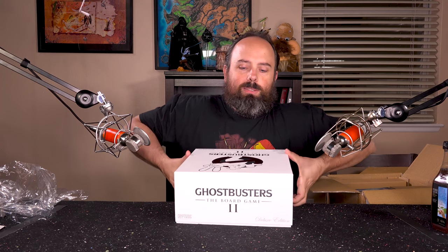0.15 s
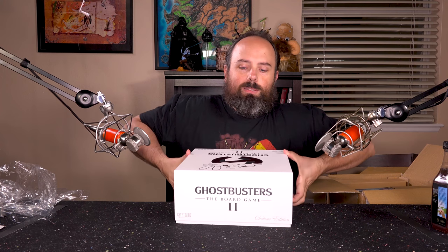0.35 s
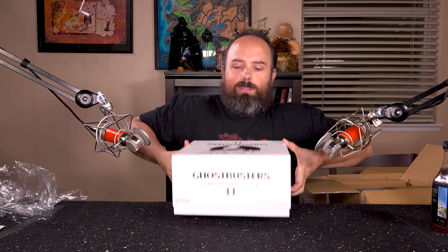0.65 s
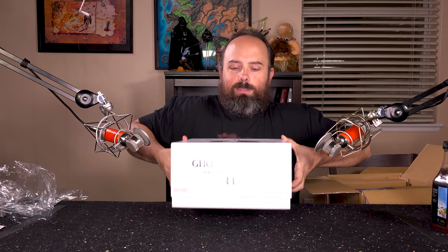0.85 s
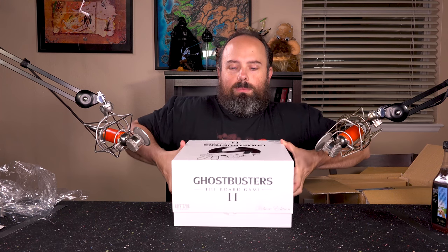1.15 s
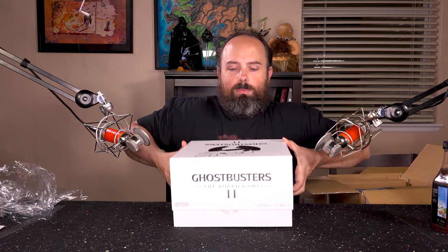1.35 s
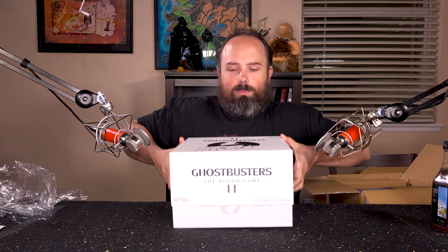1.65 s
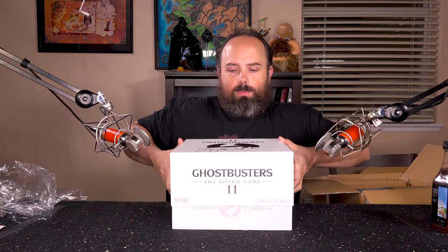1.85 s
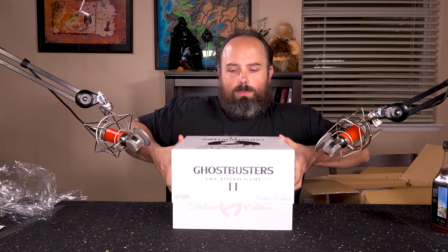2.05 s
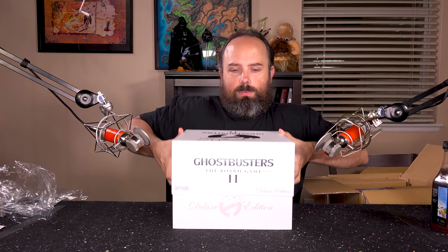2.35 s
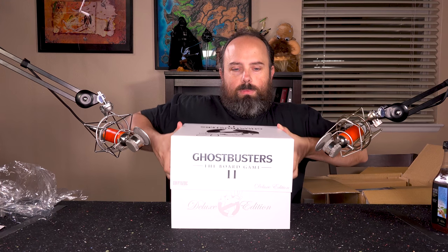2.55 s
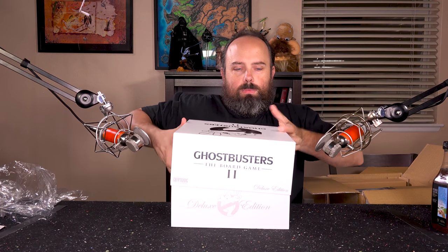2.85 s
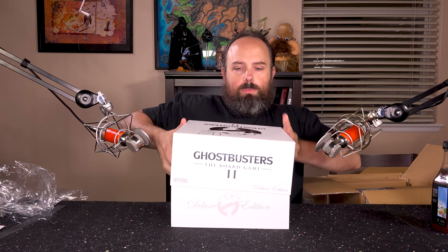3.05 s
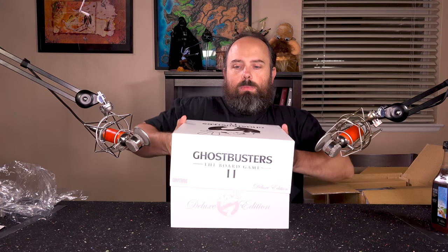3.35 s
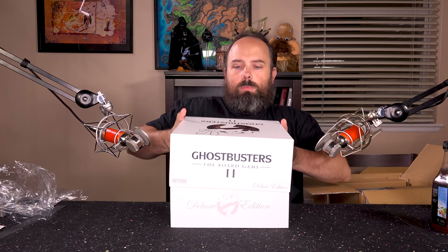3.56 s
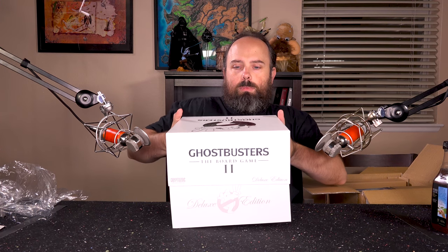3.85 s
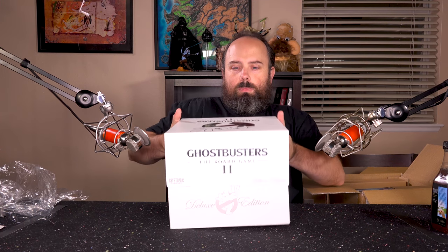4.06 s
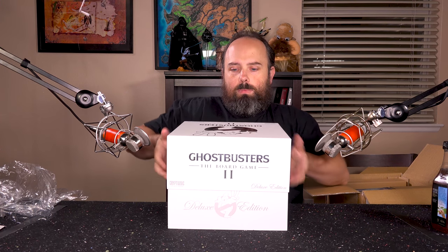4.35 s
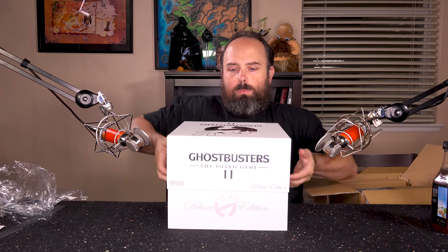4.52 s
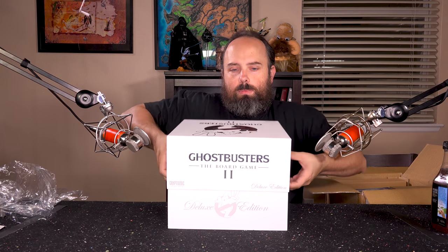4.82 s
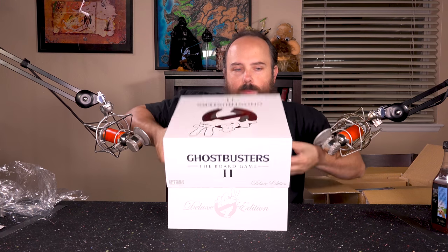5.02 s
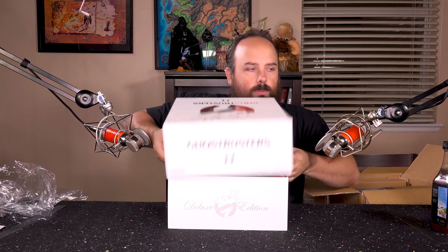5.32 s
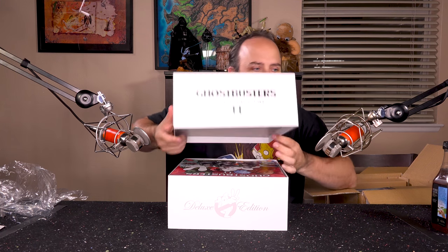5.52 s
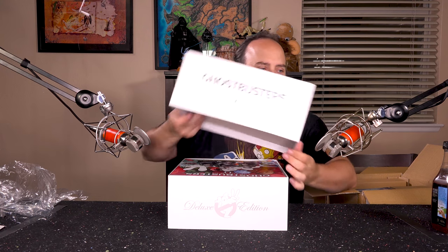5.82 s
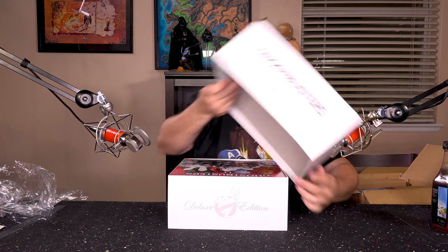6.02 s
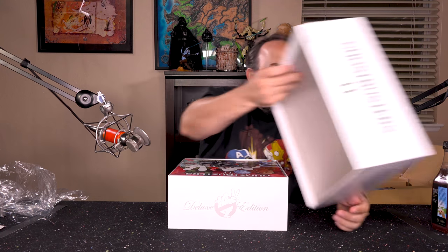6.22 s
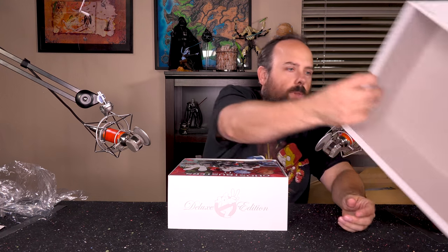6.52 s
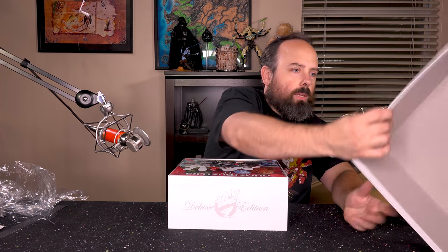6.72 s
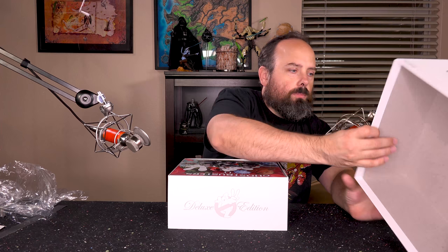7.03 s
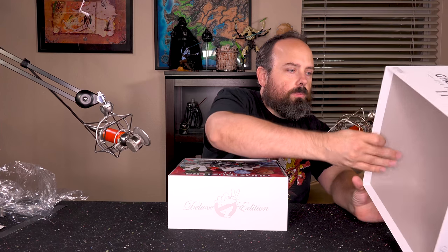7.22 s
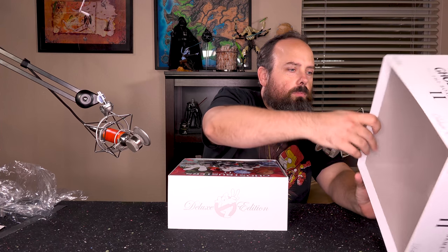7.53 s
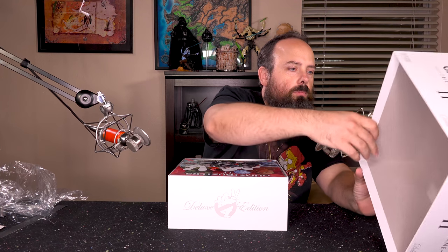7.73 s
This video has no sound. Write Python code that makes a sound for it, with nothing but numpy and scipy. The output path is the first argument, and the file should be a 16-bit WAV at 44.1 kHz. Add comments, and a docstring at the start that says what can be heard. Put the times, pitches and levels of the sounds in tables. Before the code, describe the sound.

Hands work a tight cardboard lid off a large box on a table. A long soft scrape with light knocks comes first, then short tugs, dry skin hisses and dense hollow raps with low thumps. The freed lid swishes aside and bumps down, setting off a brief low springy hum. Close wide stereo in a small quiet furnished room.

```python
"""A tight box lid worked loose by hand

Hands work a tight cardboard lid off its box on a table, between two microphones on sprung arms.
Shaped noise makes the lid drag on the box walls and the skin brush the glossy card.
Dying sines and short noise make the knocks of fingers and corners, and the thumps on the table.
The arms bounce and sway far down in the bass, over a quiet room with a faint drone."""
import sys
import numpy as np
from scipy import signal
from scipy.fft import rfft, irfft, next_fast_len
from scipy.io import wavfile
from scipy.ndimage import uniform_filter1d

SR = 44100
rng = np.random.default_rng(int(sys.argv[2]) if len(sys.argv) > 2 else 0)


def output_pcm(signal):
    """Save a mono or channel-first signal as 16-bit PCM at the path in sys.argv[1].

    Samples are clipped to [-1, 1] before scaling.
    """
    pcm = np.clip(np.atleast_2d(signal).T, -1, 1) * 32767
    wavfile.write(sys.argv[1], SR, np.round(pcm).astype(np.int16))


N = 347508  # samples, about 7.88 s

# the lid lands by a spring of the left arm: (time [s], hum level [dB], boom level [dB])
TWANGS = [(6.764, -16, -6), (6.967, -21.5, -14), (7.055, -21.5, -17)]
SWELL_DB = 31  # how far a movement is below its peak at the ends of its swell and fade times
TUG_ROUND = 1.027  # shape of a swell in dB: 1 = pointed top, 2 = round


def drag():
    """Card fibres rasp along the walls and drive the hollow of the box."""
    # one long slide up the walls: (time [s], rasp [dB], upper over lower modes [dB], hollow [dB])
    slide_rows = [(0, -56.5, 0, -60.5), (.37, -57, -6.5, -52.5), (.46, -43, -13, -53),
                  (.625, -39, -15, -46.5), (.85, -47.5, -16, -46), (.9, -40.5, -3.5, -47),
                  (1.04, -40, -17.5, -36), (1.18, -41, -21, -44.5), (1.36, -37, -9.5, -40.5),
                  (1.46, -42.5, -13, -41), (1.62, -39.5, -16.5, -59), (1.755, -38.5, -5.5, -43.5),
                  (1.85, -38.5, -12, -47), (1.95, -47, -5.5, -49), (2.3, -40.5, 4, -55),
                  (2.58, -39, 5.5, -36), (2.68, -42.5, -4, -45.5), (2.745, -37.5, -11, -28),
                  (3, -49.5, 4, -44), (3.22, -68, -6, -62), (3.35, -92, -2, -88)]
    # then separate tugs: (peak time [s], rasp [dB], swell [s], fade [s],
    # upper over lower modes [dB], hollow [dB])
    tug_rows = [(3.407, -31.5, 0.1, 0.1, -1, -29.5), (3.62, -40.5, 1, 0.054, -7, -38.5),
                (3.786, -39.5, 0.41, 0.29, -5, -35), (3.963, -38.5, 0.1, 0.16, -10.5, -36),
                (4.189, -39, 0.22, 0.22, -5.5, -36), (4.5, -40, 0.055, 0.37, -5, -42),
                (4.7, -45.5, 0.63, 0.9, -6, -33), (4.967, -42, 0.23, 0.37, -4, -25.5),
                (5.19, -44, 1, 0.096, -13.5, -45), (5.6, -49.5, 0.26, 0.37, 3.5, -43.5),
                (6.082, -43.5, 0.24, 0.48, -7.5, -42), (6.3, -41, 0.043, 0.23, 1, -39),
                (6.457, -39, 0.31, 0.32, -2, -50), (6.77, -48, 0.079, 0.52, -8.5, -32),
                (7.02, -64, 0.061, 0.3, -11, -40.5)]
    # where the lid binds: (time [s], left minus right [dB])
    binding = [(0, -4.5), (1, -3), (2.4, -3), (3.65, -6.5), (3.9, -1), (4.4, -3.5), (4.7, 2), (5.2, 2),
               (6, -2), (7.88, -11)]
    # resonances of the walls: (pitch [Hz], width [Hz], relative level [dB])
    upper_modes = [(1333, 480, 13.5), (1666, 560, 9.5), (2360, 910, 7.5), (3165, 670, 0.5),
                   (3550, 6300, 2.5)]
    lower_modes = [(393, 1370, 8.5), (587, 90, 9.5), (802, 190, 9)]
    # resonances of air and walls together: (pitch [Hz], width [Hz], relative level [dB])
    hollow_modes = [(133, 79, 8), (220, 57, 0), (307, 135, 0.5), (393, 20, -0.5)]

    slide_db, slide_bright_db, slide_hollow_db = curves(slide_rows)
    slide_upper, slide_lower = amp(shares(slide_db, slide_bright_db))
    s, db, swell, fade, bright_db, hollow_db = np.transpose(tug_rows)
    tug_levels = shares(db, bright_db) + [hollow_db]
    tug_upper, tug_lower, tug_hollow = humps(s, swell, fade, TUG_ROUND, tug_levels)

    fibres = patchy(grit(6., 2., .012, .07), 3.2)
    scuffs = patchy(grit(7., 4., .009, .07), 3.5)  # uneven catches of the rim
    even = patchy(grit(4., 2., .025, .07), 2.2)  # the long slide surges gently
    scrape = tug_upper * coloured(fibres, peaks(upper_modes))
    scrape += tug_lower * coloured(scuffs, peaks(lower_modes))
    scrape += slide_upper * coloured(even, peaks(upper_modes))
    scrape += slide_lower * coloured(even + 0.36 * scuffs, peaks(lower_modes))
    # soft fibres have little sizzle
    scrape = signal.sosfilt(signal.butter(4, 9500, fs=SR, output="sos"), scrape)

    rub = grit(4., 2., .02, .6)
    hollow = tug_hollow * coloured(rub, peaks(hollow_modes))
    # the slide misses the lowest mode
    hollow += amp(slide_hollow_db) * coloured(rub, peaks(hollow_modes[1:]))
    return sides(curves(binding)[0]) * (scrape + hollow)


def brush():
    """Skin slides over coated card: a fine dry hiss that swells and fades with each stroke."""
    # strokes: (peak time [s], level on the louder side [dB], swell [s], fade [s],
    # left minus right [dB])
    strokes = [(.02, -49, 0.053, 0.24, -4), (.61, -54, 0.45, 1, 3.5), (.908, -46, 0.064, 0.075, 8),
               (1.311, -45.5, 0.058, 0.06, 2), (1.76, -44, 0.027, 0.08, -14), (2.52, -45.5, 0.76, 0.63, 22),
               (2.6, -48, 0.64, 0.096, -17), (2.89, -42, 0.56, 0.18, -11), (3.07, -44, 0.11, 0.13, -3.5),
               (3.346, -32.5, 0.19, 0.25, -17), (3.556, -31.5, 0.14, 0.11, 8),
               (3.678, -29.5, 0.023, 0.065, -24), (3.746, -34, 0.01, 0.021, -14),
               (3.804, -26, 0.043, 0.038, -9), (3.879, -37, 0.03, 0.029, 13),
               (3.951, -31.5, 0.016, 0.022, -5), (4.176, -38.5, 0.084, 0.046, -5),
               (4.33, -44, 0.16, 0.16, -15), (4.467, -45, 0.025, 0.28, -5), (4.78, -51.5, 0.029, 0.35, 9),
               (4.97, -51, 0.16, 0.47, -4), (5.17, -56.5, 1, 0.06, -10), (5.75, -48.5, 0.3, 0.46, 7),
               (6.061, -39, 0.24, 0.085, -4.5), (6.475, -23.5, 0.29, 0.16, -9.5),
               (6.555, -31, 0.033, 0.048, -8), (6.749, -31.5, 0.11, 0.077, -13), (6.83, -39, 0.2, 0.2, -6),
               (7.03, -40, 0.16, 0.34, -10), (7.125, -44, 0.2, 0.1, -5), (7.5, -43.5, 1, 0.8, -11),
               (7.77, -54, 0.14, 0.78, 0.5)]
    # tone of the hiss: (frequency [Hz], relative level per Hz [dB])
    brush_colour = [(1180, -51), (2000, -21), (2270, -16), (4040, -8.5), (5360, -2.5), (7420, -6.5),
                    (9110, -4.5), (10800, -15), (15500, -23)]
    # change of the treble of the hiss: (time [s], extra level [dB])
    dryness = [(0, -3), (2.45, -10), (2.75, 3), (3.2, 4), (5, 5), (6.3, -0.5), (7.2, 3.5), (7.88, 6)]

    s, db, swell, fade, pan_db = np.transpose(strokes)
    hands = humps(s, swell, fade, 1.15, panned(db, pan_db))
    skin = patchy(grit(4., 1., .01, .05), 2.)
    hiss = coloured(skin, spectrum(brush_colour))
    treble = signal.butter(4, 10500, "high", fs=SR, output="sos")
    top = signal.sosfiltfilt(treble, hiss)
    return hands * (hiss + top * (amp(curves(dryness)[0]) - 1))


def knocks():
    """A tick of contact, a rap in the panel modes and a low thud; each side hears its own mix."""
    # knocks on the panels: (time [s], rap [dB], tick relative to rap [dB],
    # thud relative to rap [dB], starting pitch of thud [Hz], left minus right [dB])
    hits = [(0.173, -20, -36, -30, 200, -9), (0.484, -16.5, -41, -10, 427, -12),
            (0.617, -22, -31, 4, 287, 5), (0.816, -27, -33, 4, 308, -12), (0.934, -18.5, -29, -2.5, 244, 3),
            (0.9915, -10.5, -21, 0, 302, -11), (1.038, -20, -34, 5, 404, -5),
            (1.061, -13.5, -36, -2.5, 390, -2), (1.103, -21.5, -24, 5, 272, 3),
            (1.154, -24, -9.5, -12, 275, 2), (1.234, -16.5, -20.5, 0, 297, -3),
            (1.313, -18, -30, 3.5, 210, 12), (1.357, -14.5, -33, -15, 322, 22),
            (2.595, -52.5, 15.5, 6, 220, -11), (2.712, -14.5, -16, 10.5, 290, -11),
            (2.722, -13, -26, 4, 300, 4), (3.032, -4.5, -60, -10.5, 238, 9),
            (3.092, -22.5, -20.5, 7, 233, -10), (3.255, -11.5, -22, 2.5, 279, -11),
            (3.533, -34.5, -6, 22.5, 267, -12), (3.664, -35.5, -4, 27, 288, -11),
            (3.794, -7.5, -48.5, -5, 267, 5), (3.876, -8, -47.5, -5.5, 248, 9),
            (3.946, -21, -15, 10.5, 237, -12), (4.196, -25, -20, 15, 267, -7),
            (4.383, -19.5, -44, 6.5, 212, -15), (4.447, -18, -44, 5, 216, -14),
            (4.47, -18.5, -35, 0, 293, -7), (4.48, -19, -36, 5.5, 298, 3), (4.531, -29, -42, 12, 286, -19),
            (4.55, -3, -62, -2, 150, -23), (4.637, -15, -53, 3.5, 301, 9),
            (4.669, -12.5, -50, 2.5, 254, -14), (4.726, -33, -46, -7, 302, -2),
            (4.787, -12.5, -31, 6, 246, -4), (4.865, -11.5, -50, -8, 208, 15),
            (4.897, -21.5, -38, -15, 250, 22), (4.943, -20, -29, -1, 330, -6),
            (4.956, -31, -40, 21, 327, -4), (4.97, -17, -37, 14.5, 328, 9), (5.002, -13, -38, 6, 390, -9),
            (5.034, -14.5, -18, 4, 315, 3), (5.187, -32, -34, 6.5, 278, -4), (5.376, -20, -48, 14, 402, 5),
            (5.56, -31, -16.5, 11, 161, -25), (6.071, -10.5, -19, 8.5, 187, -3.5),
            (6.284, -14, -10, -0.5, 390, -1.5), (6.755, -28, -49, 5.5, 420, -7),
            (6.961, -38, -69, 30.5, 158, -10)]
    # edge of the card, pitches vary a little: (pitch [Hz], level in tick [dB], 60 dB decay [s])
    snap = [(3846, 5, 0.015), (5230, 10.5, 0.011), (9550, 13, 0.0058)]
    # flat panel, pitches vary a little: (pitch [Hz], relative level [dB], 60 dB decay [s])
    panel = [(457, -10, 0.004), (712, -1.5, 0.055), (870, 4.5, 0.031), (1302, 8.5, 0.024),
             (1770, 13.5, 0.0067), (2070, -14, 0.035), (2375, 13, 0.011)]
    thud_t60, thud_sag = 0.043, .12  # decay by 60 dB (s); share of the pitch lost as the panel settles

    out, t = np.zeros((2, N)), np.arange(8000) / SR
    high = signal.butter(4, [3000, 10500], "band", fs=SR, output="sos")
    middle = signal.butter(2, [500, 3000], "band", fs=SR, output="sos")
    sag = 1 - thud_sag * (1 - np.exp(-t / 0.042))
    for s, db, tick_db, thud_db, thud_hz, pan_db in hits:
        noise = rng.standard_normal((2, len(t)))
        snap_luck = rng.standard_normal((2, len(snap)))
        panel_luck = rng.standard_normal((2, len(panel)))

        tick = amp(1.0) * evened(signal.sosfilt(high, noise)) * amp(-60 * t / 0.026)
        tick += np.array([ring(snap, t, 1 + 0.057 * d) for d in snap_luck])
        tick = dulled(tick, 9000 * amp(.4 * (tick_db + 5)))  # a weaker tick is duller

        modes = np.array([ring(panel, t, 1 + 0.067 * d) for d in panel_luck])
        rap = amp(-14) * modes
        rap += amp(7.5) * signal.sosfilt(middle, noise) * amp(-60 * t / 0.02)
        rap = dulled(rap, 2600 * amp(.3 * (tick_db + 12)))  # a soft pad of flesh dulls the rap

        thud_modes = [(thud_hz, -3, thud_t60), (1.303 * thud_hz, -10, .03)]
        thud = ring(thud_modes, t, [sag, sag]) * (1 - np.exp(-t / 0.0025))

        # flesh also slows the attack
        rise = 1 - np.exp(-t / (0.00059 * amp(-.3 * (tick_db + 14.5))))
        knock = rap + amp(tick_db) * tick - amp(thud_db) * thud
        add(out, s + .0008, amp(db) * sides(pan_db) * rise * knock)
    return out


def lid():
    """Fingers shift their grip on the freed lid, which sings faintly in its own narrow modes."""
    # grips: (peak time [s], level on the louder side [dB], swell [s], fade [s],
    # left minus right [dB])
    grips = [(5.6, -44.5, 0.19, 0.77, -2), (6, -47, 0.015, 0.26, 0), (7.25, -51.5, 0.21, 0.14, -18),
             (7.355, -47.5, 0.075, 0.3, -16), (7.54, -54.5, 0.069, 0.22, -12)]
    # freed lid in the air: (pitch [Hz], width [Hz], relative level [dB])
    lid_held = [(433, 65, 5), (827, 140, 1.5), (1380, 150, -2.5)]
    # lid standing on its edge: (pitch [Hz], width [Hz], relative level [dB])
    lid_down = [(562, 35, -2), (835, 100, 7), (1087, 57, -2), (1610, 160, -0.5)]

    s, db, swell, fade, pan_db = np.transpose(grips)
    hands = humps(s, swell, fade, TUG_ROUND, panned(db, pan_db))
    rub = grit(9.8, 4.6, 0.011, 0.12)
    landed = np.arange(N) / SR > TWANGS[0][0]
    held, down = coloured(rub, peaks(lid_held)), coloured(rub, peaks(lid_down))
    return hands * np.where(landed, down, held)


def twangs():
    """The struck spring hums unsteadily and the air in the empty lid booms, until the lid damps it."""
    hum_hz, hum_t60 = 221, .9  # spring: pitch (Hz), decay by 60 dB (s)
    boom_hz, boom_t60 = 231.8, 0.19  # air in the lid: pitch (Hz), decay by 60 dB (s)
    stop = 7.3  # silent from here (s)

    out, t = np.zeros((2, N)), np.arange(SR) / SR
    for s, hum_db, boom_db in TWANGS:
        loose = rng.standard_normal(SR)
        loose = evened(uniform_filter1d(uniform_filter1d(loose, 500), 500))
        tone = ring([(hum_hz, hum_db, hum_t60), (boom_hz, boom_db, boom_t60)], t, [1, 1])
        rise = 1 - np.exp(-t / 0.012)
        damping = np.clip((stop - s - t) / 0.054, 0, 1)
        rattle = amp(3.2 * loose)
        add(out, s, rattle * tone * rise * damping * amp([[0], [-14]]))  # weaker on the right
    return out


def thumps():
    """The table top booms, reaching the right arm later; each arm bounces on its springs."""
    # thumps into the table, levels before a fixed trim:
    # (time [s], table [dB], bounce of the arms [dB], table left minus right [dB])
    table_hits = [(1.348, -37, -13.5, 16), (1.741, -42, -8.5, -12), (1.957, -36, -19, 16),
                  (2.716, -18, -14.5, -2), (3.248, -24.5, -43, -6), (3.943, -27.5, -29, 0),
                  (4.187, -25, -10, 1), (4.5, -27, -21, -9), (5.22, -35, -21, -18),
                  (6.068, -16, -20.5, -3.5), (6.753, -18.5, -34, -2), (6.963, -23.5, -21, -10.5)]
    # table top, pitches vary a little: (pitch [Hz], relative level [dB], 60 dB decay [s])
    table_modes = [(50.2, -0.5, 0.7), (76, 11, 0.135), (109, 14.5, 0.11), (143.2, -3, 0.4),
                   (186.6, -3, 0.36), (263.4, -1, 0.29)]
    # left arm, right arm: (bounce rate [Hz], 60 dB decay [s])
    arm_bounce = [(22, 1.5), (24, 1.3)]

    out, t = np.zeros((2, N)), np.arange(SR) / SR
    bounce = np.array([ring([(hz, 0, t60)], t, [1]) for hz, t60 in arm_bounce])
    for s, db, bounce_db, pan_db in table_hits:
        luck = rng.standard_normal((2, len(table_modes)))
        boom = np.array([ring(table_modes, t, 1 + 0.06 * d) for d in luck])
        boom *= 1 - np.exp(-t / 0.0032)
        boom[1] = np.interp(t - .004, t, boom[1])  # 4 ms later on the right
        add(out, s, -amp(db - 2.5) * sides(pan_db) * boom + amp(bounce_db + 2.5) * bounce)
    return out


def shake():
    """Hands on the table shake the arms: each swings slowly at its own rate, over a lumpy rumble."""
    # shaking, levels before a fixed trim: (time [s], sway [dB], rumble [dB])
    shaking = [(0, -15.5, -41), (.3, -19, -38), (1.1, -31.5, -42), (1.5, -24.5, -32.5), (2.4, -21.5, -43),
               (2.8, -45, -30), (3.3, -15.5, -43), (3.8, -23.5, -37.5), (4.2, -41, -39.5),
               (4.65, -32, -31.5), (5.2, -17.5, -33), (5.7, -20.5, -42.5), (6.15, -23, -39),
               (6.55, -23.5, -44.5), (7, -24, -31), (7.88, -37, -48.5)]
    # left arm, right arm: (sway rate [Hz], width [Hz])
    arm_sway = [(7.3, 2.17), (10, 1.7)]

    sway_db, rumble_db = curves(shaking)
    push = rng.standard_normal((2, N))
    sway = [coloured(push[[k]], peaks([(hz, w, 0)]))[0] for k, (hz, w) in enumerate(arm_sway)]
    lumps = grit(0., 3., .04, .1)
    rumble = coloured(lumps, spectrum([(16, 8.0), (30, 8.5), (60, -4.5), (100, -5.5)]))
    return amp(sway_db + [[4], [1.5]]) * np.array(sway) + amp(rumble_db + 9.0) * rumble


def walls(x):
    """Short dull tail of a furnished room: dying noise stands for the many reflections."""
    t = np.arange(SR // 3) / SR
    tail = rng.standard_normal((2, len(t))) * amp(-60 * t / 0.063) * (t > .006)
    tail = signal.lfilter([1], [1, -.6], tail)
    return signal.oaconvolve(x, tail / np.linalg.norm(tail[0]), axes=1)[:, :N]


def room():
    """Steady quiet noise of the room, with noise in a narrow band as a faint fuzzy drone."""
    # tone of the room: (frequency [Hz], relative level per Hz [dB])
    room_colour = [(150, -24), (400, 1), (1000, -5), (2500, -18), (6000, -2.5), (10000, -8.5), (12000, -20)]
    # drone: (pitch [Hz], width [Hz], relative level [dB])
    drone_modes = [(140.8, 25, 0)]
    room_db, drone_db = -62, -47
    still = amp(room_db) * coloured(rng.standard_normal((2, N)), spectrum(room_colour))
    return still + amp(drone_db) * coloured(rng.standard_normal((2, N)), peaks(drone_modes))


def grit(grain_db, flutter_db, flutter_s, same):
    """Friction: noise with uneven grains whose strength flutters; part is common to both sides."""
    a, b, slow = rng.standard_normal((3, 2, N))
    size = max(round(flutter_s * SR), 1)
    flutter = evened(uniform_filter1d(uniform_filter1d(slow, size), size))
    x = a * amp(grain_db * b + flutter_db * flutter)
    same = np.clip(same, 0, 1)
    return np.array([x[0], same * x[0] + np.sqrt(1 - same ** 2) * x[1]])


def patchy(x, depth_db):
    """The contact wanders over the card, so the colour shifts in short patches."""
    z = signal.stft(x, nperseg=512)[2]
    patches = rng.standard_normal(z.shape)
    patches = uniform_filter1d(uniform_filter1d(patches, 4, 1), 7, 2)  # blurred over pitch, then time
    z = z * amp(depth_db * patches / patches.std())
    return evened(signal.istft(z, nperseg=512)[1][:, :N])


def humps(s, swell, fade, roundness, levels_db):
    """Movements that swell to a peak and fade; their powers add in each layer. Returns gains."""
    t = np.arange(0, N + 64, 64) / SR  # coarse steps are enough
    away = t - s[:, None]
    away = np.where(away < 0, -away / swell[:, None], away / fade[:, None])
    power = amp(2 * np.array(levels_db)) @ amp(-2 * SWELL_DB * away ** roundness)
    return np.array([np.interp(np.arange(N) / SR, t, np.sqrt(p)) for p in power])


def shares(db, bright_db):
    """Splits the power of a rasp between upper and lower modes."""
    lower_db = db - 10 * np.log10(1 + amp(2 * bright_db))
    return [lower_db + bright_db, lower_db]


def panned(db, pan_db):
    """Left and right levels; the louder side keeps the given level."""
    return [db + np.minimum(pan_db, 0), db - np.maximum(pan_db, 0)]


def sides(pan_db):
    """Left and right gains whose mean power is that of two gains of 1 doubled, split by pan_db."""
    ratio = amp(np.array([pan_db, -np.asarray(pan_db)]).reshape(2, -1) / 2)
    return 2 * ratio / np.sqrt((ratio ** 2).sum(0))


def coloured(x, gain):
    """Shapes the spectrum by gain(Hz) and evens the level."""
    size = next_fast_len(N)
    shaped = rfft(x, size) * gain(np.fft.rfftfreq(size, 1 / SR))
    return evened(irfft(shaped, size)[:, :N])


def spectrum(points):
    """Gain from (Hz, dB) points on a log axis, almost nothing past the ends."""
    f, db = np.transpose(points)
    return lambda hz: amp(np.interp(np.log(hz + 1e-3), np.log(f), db, left=-90, right=-90))


def peaks(modes):
    """Gain from (Hz, width, dB) resonances, whose powers add."""
    def gain(hz):
        return np.sqrt(sum(amp(db) ** 2 / (1 + (2 * (hz - f) / w) ** 2) ** 2 for f, w, db in modes))
    return gain


def dulled(x, cutoff_hz):
    """Softens the treble with two equal gentle low-pass steps."""
    keep = np.exp(-2 * np.pi * cutoff_hz / SR)
    return signal.lfilter([(1 - keep) ** 2], [1, -2 * keep, keep ** 2], x)


def ring(modes, t, detune):
    """Struck object: a sum of dying sines, each pitch multiplied by its detune."""
    return sum(amp(db - 60 * t / t60) * np.sin(2 * np.pi * hz * d * t)
               for (hz, db, t60), d in zip(modes, detune))


def curves(rows):
    """Columns of a table, one value per sample."""
    s, *columns = np.transpose(rows)
    return [np.interp(np.arange(N) / SR, s, c) for c in columns]


def evened(x):
    """Rms 1 in each channel."""
    return x / np.sqrt(np.mean(x ** 2, -1, keepdims=True) + 1e-20)


def amp(db):
    """Gain from decibels."""
    return 10 ** (np.asarray(db) / 20)


def add(mix, s, sound):
    """Adds a sound into the mix from s seconds on, cut at the end."""
    part = mix[:, round(s * SR):][:, :sound.shape[1]]
    part += sound[:, :part.shape[1]]


def scene():
    """All sources together; only the knocks get the tail of the room."""
    hits = knocks()
    box = drag() + brush() + hits + lid()
    table = twangs() + thumps() + shake()
    return box + table + amp(-17.0) * walls(hits) + room()


def record(dry):
    """Band limit: removes the highest treble, above about 15.85 kHz."""
    edge_hz = 15850
    padded = np.pad(dry, ((0, 0), (511, 511)), "reflect")
    low_pass = signal.firwin(1023, edge_hz, window=("kaiser", 9), fs=SR)
    return signal.oaconvolve(padded, low_pass[None], "valid")


dry = scene()
out = record(dry)
output_pcm(out)
```